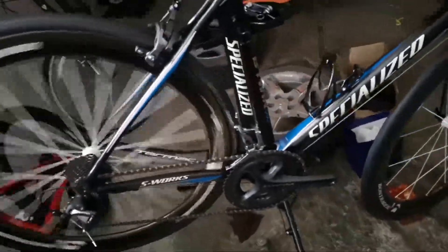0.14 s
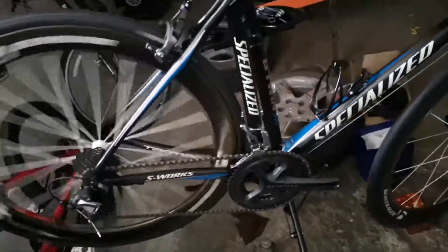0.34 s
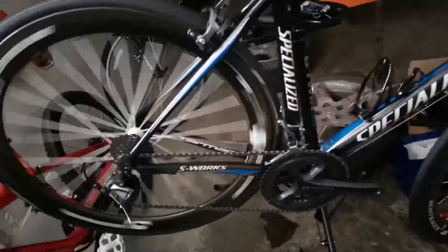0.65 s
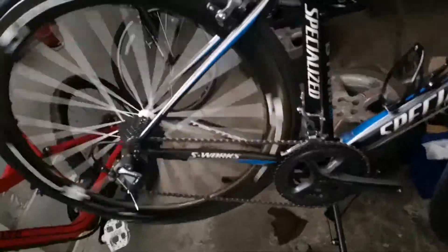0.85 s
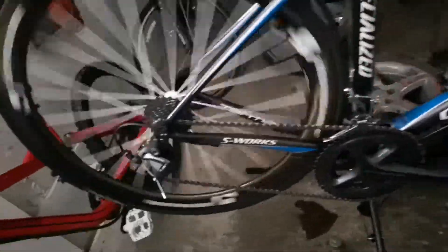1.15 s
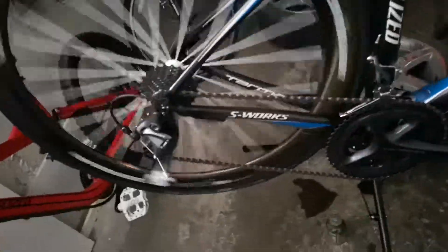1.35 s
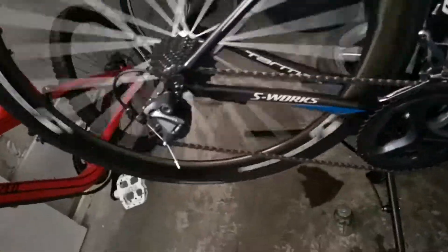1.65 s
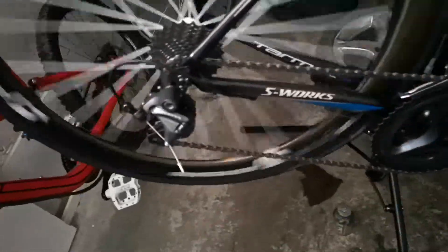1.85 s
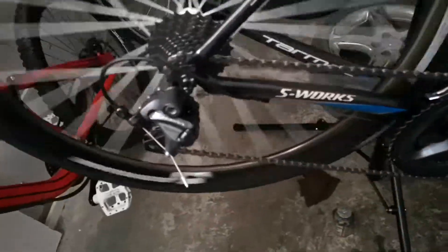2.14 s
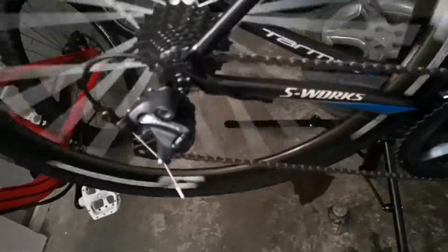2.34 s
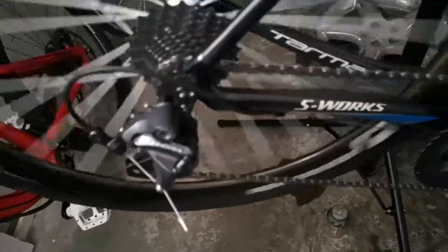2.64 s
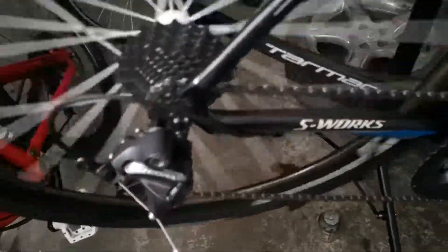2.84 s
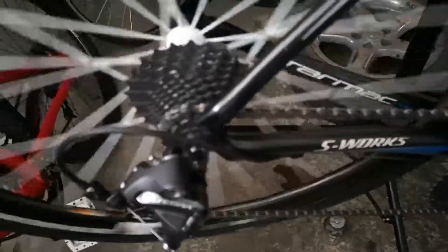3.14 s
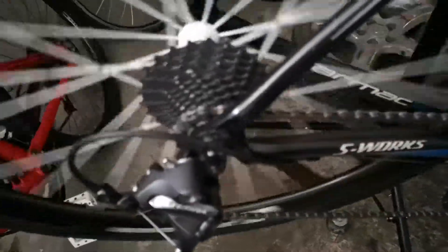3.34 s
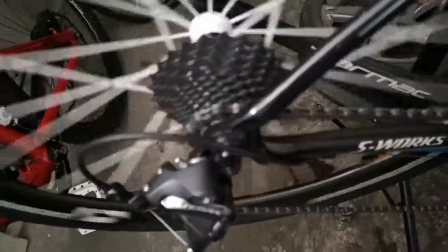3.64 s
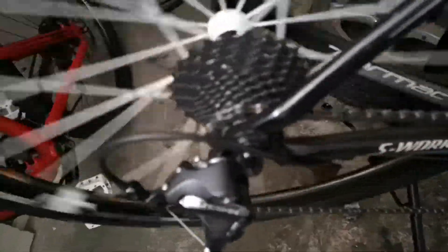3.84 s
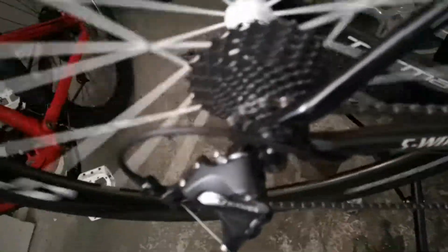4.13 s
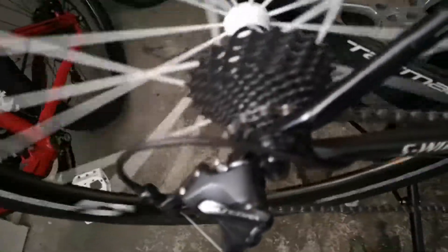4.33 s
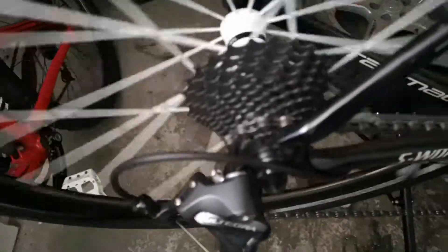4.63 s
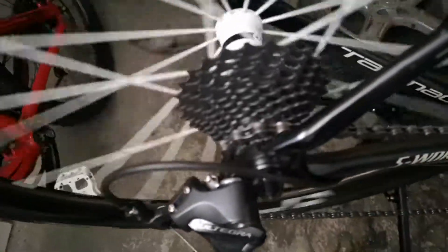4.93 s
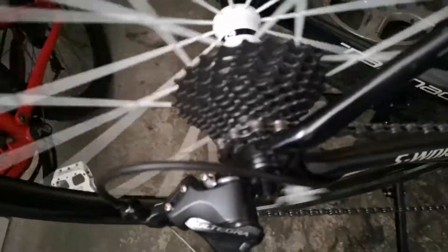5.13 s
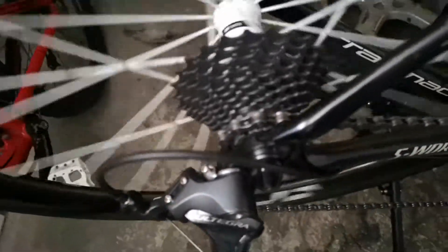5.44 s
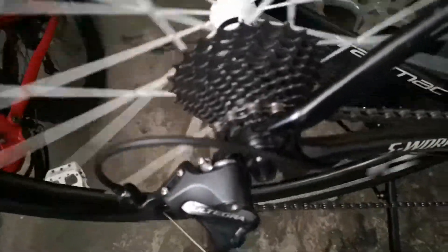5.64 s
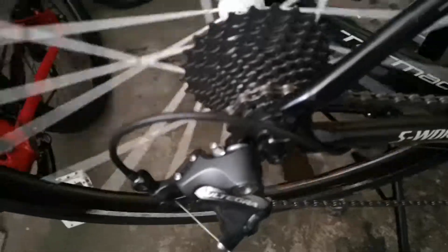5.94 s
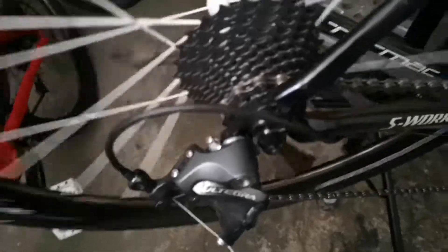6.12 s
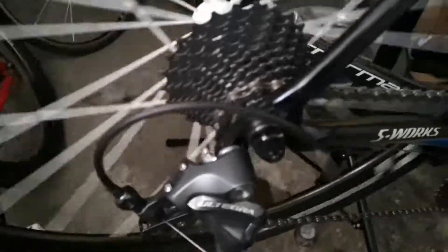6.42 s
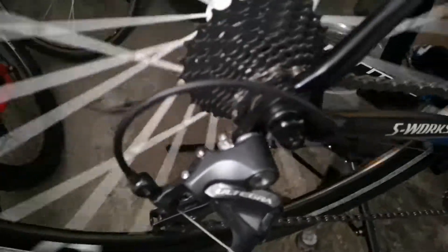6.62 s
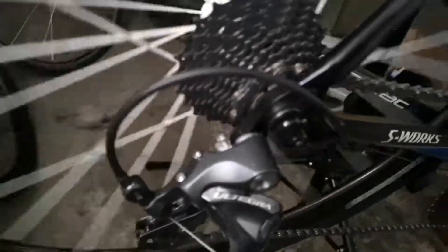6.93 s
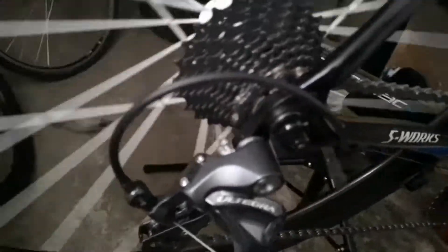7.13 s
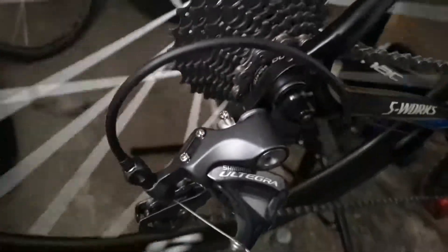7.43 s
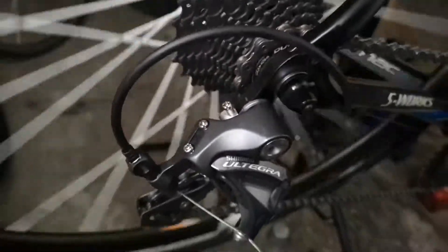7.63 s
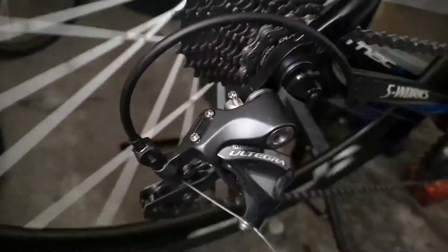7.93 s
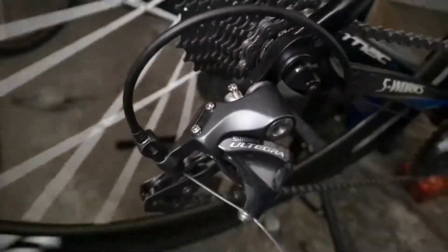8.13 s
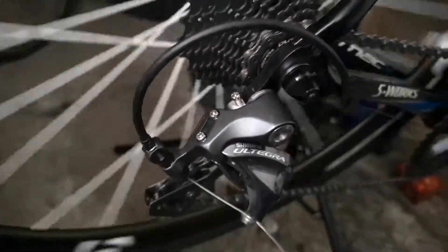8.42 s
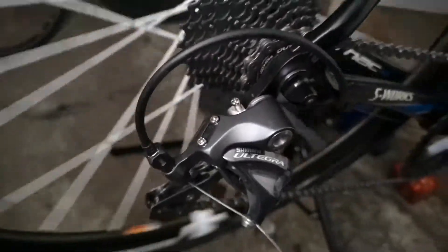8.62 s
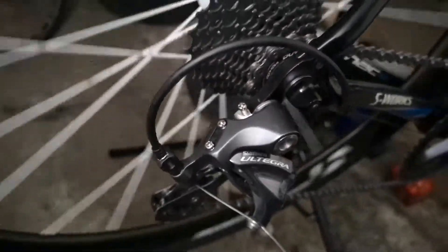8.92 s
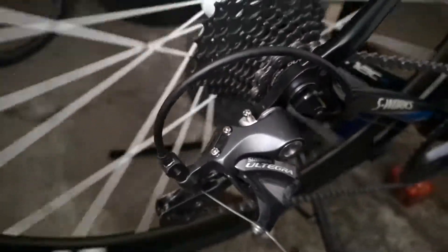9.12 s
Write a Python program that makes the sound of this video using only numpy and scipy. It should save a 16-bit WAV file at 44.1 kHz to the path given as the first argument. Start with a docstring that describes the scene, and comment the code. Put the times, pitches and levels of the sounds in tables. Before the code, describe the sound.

A bicycle's rear wheel is already coasting at the start, its freewheel ratchet making a bright, high-pitched buzz of rapid metallic clicks. The clicking continues for the whole nine seconds or so, slowing gradually from about thirty-five to about twenty clicks a second. It swells with each turn of the wheel, with a light ringing of hub and rim and a faint whirr beneath. From about 2 to 5 seconds the hand-held microphone moves closer, and the clicks grow louder and drier, leaning slightly right. Just before 4 seconds come a few dull handling bumps, the last the strongest. From about 6 to 8.5 seconds the clicks have a harder, grittier snap and a brief steely ring. A softer bump falls at 7 seconds, with faint finger rubs around 8 and 9. Quiet garage air and a faint low hum lie underneath throughout.

```python
"""Bicycle freewheel in a garage

A rear wheel coasts: its pawls drop over 18 ratchet teeth, ever more slowly, and hub, cassette and
rim ring on. The ratchet runs slightly off centre, so the buzz swells once a turn.
A hand-held microphone moves in close, with a few bumps and rubs, over room air and a faint low hum."""
import sys
import numpy as np
from scipy import signal
from scipy.fft import rfft, irfft
from scipy.io import wavfile
from scipy.ndimage import uniform_filter1d

SR = 44100
rng = np.random.default_rng(int(sys.argv[2]) if len(sys.argv) > 2 else 0)


def store_wav(level_fs):
    """Save 16-bit WAV to argv[1]."""
    pcm = np.round(np.clip(np.atleast_2d(level_fs), -1, 1) * 32767)
    wavfile.write(sys.argv[1], SR, pcm.T.astype(np.int16))


N = 408793
TEETH = 18
RIGHT_DELAY_S = .0006  # sound reaches the left channel first


def ratchet(times, teeth, level_db=1.91, hard_db=3.0, clack_db=8, ping_db=-5.5, lead_s=.0041, size=8192):
    """Each pawl drop rings the hub: a clack that swells twice a turn, a cassette ping that swells once."""
    # colour of a pawl strike: f/Hz, level/dB
    strike_colour = [(820, -43.5), (1400, -26.5), (1490, -20), (1760, -24.5), (1930, -2.5), (2090, -10.5),
                     (3500, -10.5), (4070, -3.5), (5180, -2.5), (6080, -13), (6930, -12), (7900, -0.5),
                     (10400, -20.5), (14400, -33), (15500, -21)]
    hz, out = np.fft.rfftfreq(size, 1 / SR), np.zeros((2, N))
    rings = hub_rings(hz)
    wear_db = 1.14 * rng.standard_normal((TEETH, 3))  # each tooth's own strength, clack and ping
    clack, ping, fizz = hump(hz, 2770, 0.29), hump(hz, 9600, 0.26), hump(hz, 19200, 0.78)
    renew_rad = 0.92
    for s, tooth in zip(times, teeth):
        near_db, _, pan_db = mic_position(s)
        vary_db = wear_db[tooth] + 0.55 * rng.standard_normal(3)
        pan_db = pan_db + 2.25 * rng.standard_normal()
        if tooth == 0:  # the hand has moved since the last turn, so the fine peaks shift
            rings = whiten(np.cos(renew_rad) * rings + np.sin(renew_rad) * hub_rings(hz))
        colour_db = curve_at(strike_colour, hz) + near_db + vary_db[0] + hard_db * hardness(s, tooth)
        colour_db += force_db(tooth) * (1 - 0.86 * fizz)  # the top treble follows the force less
        colour_db += clack * (clack_db + 0.5 * lobes(tooth, peak_tooth=6.16, count=2) + vary_db[1])
        colour_db += ping * (ping_db + 2.7 * lobes(tooth, peak_tooth=12.8) + vary_db[2])
        click = irfft(rings[tooth] * pawl_drop(hz) * struck_body(colour_db))
        add(out, s - lead_s, click * gain_of([[pan_db / 2], [-pan_db / 2]]))
    return gain_of(level_db) * out


def pawl_drop(hz, spread_s=.0007, scrape_db=-17, scrape_s=0.00133, lead_s=.004, size=8192, pawls=3):
    """Spectrum of one drop: the pawls scrape off the tooth's edge and land almost together."""
    t = np.arange(size) / SR - lead_s
    landings = lead_s + abs(rng.normal(0, spread_s, (pawls, 1)))
    force = gain_of(rng.normal(0, 4.1, (pawls, 1)))
    blows = (force * np.exp(-2j * np.pi * hz * landings)).sum(0)
    scrape = rfft(rng.standard_normal(size) * np.exp(-abs(t) / scrape_s))
    return whiten(unit_rms(blows) + gain_of(scrape_db) * unit_rms(scrape), bins=301)


def hub_rings(hz, crack_s=0.0062, ring_s=0.012, ring_db=-10, direct_db=-12, damp_db=7, size=8192):
    """Dense metal modes, struck at another spot by each tooth: first arrival, crack, duller ring."""
    t = np.arange(size) / SR
    modes = rng.standard_normal((TEETH, 2, size))
    crack = rfft(modes * np.exp(-t / crack_s))
    ring = rfft(modes * np.exp(-t / ring_s) * (1 - np.exp(-t / crack_s)))
    body = whiten(crack + gain_of(ring_db) * ring * struck_body(-damp_db * hump(hz, 12000, 0.17)))
    direct = np.exp(-2j * np.pi * hz * np.array([[0], [RIGHT_DELAY_S]]))
    return whiten(body + gain_of(direct_db) * direct * np.minimum(hz / 7000, 1))


def turns(s, start_turns=-.06179, turns_per_s=1.96301, drag_per_s=.04, friction_per_s2=.054287):
    """The wheel's angle in turns at time s, as air drag and bearing friction slow it."""
    coast = (1 - np.exp(-drag_per_s * s)) / drag_per_s
    return start_turns + turns_per_s * coast - friction_per_s2 * (s - coast) / drag_per_s


def drop_times(wobble_s=0.00033):
    """Time and tooth of every click; the off-centre ratchet makes them run early and late by turns."""
    clock = np.arange(N) / SR
    passed = TEETH * turns(clock)
    clicks = np.arange(np.ceil(passed[0]), passed[-1]).astype(int)
    times = np.interp(clicks, passed, clock) + wobble_s * lobes(clicks, peak_tooth=16.5)
    return times, clicks % TEETH


def force_db(tooth, off_centre_db=2, oval_db=0.5):
    """How hard the pawls drop from this tooth of the slightly off-centre, slightly oval ratchet."""
    return off_centre_db * lobes(tooth, peak_tooth=7.86) + oval_db * lobes(tooth, 3.66, count=2)


def hardness(s, tooth):
    """How hard the pawls land from this tooth (0-1), heard best from the axle's end."""
    # stretches of hard landings: middle/tooth, half width/teeth, hardness/0-1
    hard_teeth = [(5.6, 1.73, 0.74), (10.3, 0.46, 0.04), (14, 1.06, 0.25)]
    _, axle_view, _ = mic_position(s)
    landing = sum(hard * np.exp(-.5 * ((tooth - mid) / width) ** 2) for mid, width, hard in hard_teeth)
    return axle_view * landing


def pawl_snaps(times, teeth, level_db=-7.5, axle_db=5.0, hard_db=4.0, vary_db=2.5,
               late_s=.0003, rise_s=0.00034, decay_s=0.0025, size=1024):
    """The pawls seat with a dry, gritty snap of steel on steel, which carries only a short way."""
    t, hz, out = np.arange(size) / SR, np.fft.rfftfreq(size, 1 / SR), np.zeros((2, N))
    # colour of the snap: f/Hz, level/dB
    steel = [(1200, -36.5), (2200, -1.0), (5000, -11.5), (6400, -29.0), (8300, -7.0),
             (11000, -22), (15000, -20.5)]
    colour = struck_body(curve_at(steel, hz))
    burst = np.exp(-t / decay_s) * (1 - np.exp(-t / rise_s))
    for s, tooth in zip(times, teeth):
        grit = whiten(rfft(rng.standard_normal((2, size)) * burst), bins=61)
        near_db, axle_view, _ = mic_position(s)
        db = level_db + 1.55 * near_db + axle_db * axle_view
        db += 0.56 * force_db(tooth) + hard_db * hardness(s, tooth) + vary_db * rng.standard_normal()
        add(out, s + late_s, gain_of(db) * irfft(grit * colour))
    return out


def hub_chime(times, teeth, level_db=-1, vary_db=1.0, rise_s=0.00058):
    """Hard landings set the hub chiming briefly, always on the same few tones."""
    # hub modes that only a hard landing wakes: f/Hz, level/dB, t60/s
    chime_modes = [(2262, -4.5, 0.043), (2404, -11.5, .04), (4140, -4, 0.032), (4336, -11.5, .04),
                   (7820, -9, .06)]
    t, out = np.arange(SR // 10) / SR, np.zeros((2, N))
    for s, hard in zip(times, hardness(times, teeth)):
        for hz, db, t60 in chime_modes:
            phase = 2 * np.pi * rng.random((2, 1))
            ring = np.sin(2 * np.pi * hz * t + phase) * ring_envelope(t, t60, rise_s)
            force = hard * gain_of(db + vary_db * rng.standard_normal())
            add(out, s, force * ring / np.linalg.norm(ring))
    return gain_of(level_db) * out


def wheel_ring(times, teeth, level_db=-9.0, vary_db=2.5, beam_hz=900, scatter_s=0.00016):
    """The clicks ring rim, spokes and sprockets; each mode swells as a lobe passes the microphone."""
    # wheel modes with one lobe and with two: f/Hz, level/dB, t60/s, swing/dB, peak/tooth
    one_lobe_modes = [(586.8, -44, .35, 7, 12.5), (7700, -21, .1, 3, 8), (7870, -20, .09, 3, 8),
                      (8010, -22, .09, 3, 8)]
    two_lobe_modes = [(1186, -39, 0.35, 3.5, 3.4), (1519, -28.5, 0.26, 4.9, 4),
                      (1532, -31, 0.78, 8.3, 2.55), (1680, -28, 0.48, 4.1, 4.2),
                      (1894, -17, 0.15, 6.4, 4.63), (1894, -24, 0.061, 4.3, 9.8),
                      (2013, -21.5, 0.16, 5.7, 2.1), (2275, -16.5, 0.015, 3.7, 5.97),
                      (4068, -15.5, 0.026, 4.2, 5.45)]
    t, out = np.arange(SR // 3) / SR, np.zeros((2, N))
    for count, modes in enumerate([one_lobe_modes, two_lobe_modes], 1):
        for hz, db, t60, swing_db, peak_tooth in modes:
            # low modes fill the room, so nearness lifts them less
            near_db = 2.44 * mic_position(times)[0] / (1 + (beam_hz / hz) ** 2)
            swell_db = swing_db * lobes(teeth, peak_tooth, count)
            force = gain_of(db + near_db + swell_db + vary_db * rng.standard_normal(len(times)))
            # the pawls never land quite alike, which scatters the phase of the higher modes
            blows = force[:, None] * np.exp(2j * np.pi * hz * rng.normal(0, scatter_s, (len(times), 2)))
            ring = np.exp(2j * np.pi * hz * t) * ring_envelope(t, t60, rise_s=0.00014)
            ring /= np.linalg.norm(ring.imag)
            for s, blow in zip(times, blows):
                add(out, s, (blow[:, None] * ring).imag)
    return gain_of(level_db) * out


def spoke_swirl(x, path_s=0.00014, smooth_samples=1200):
    """The spinning spokes keep changing the path to each channel, which blurs the ringing tones."""
    at = np.arange(N)
    drift = uniform_filter1d(rng.standard_normal((2, N)), smooth_samples)
    drift = uniform_filter1d(drift, smooth_samples)
    return np.array([np.interp(at + path_s * SR * unit_rms(d), at, side) for d, side in zip(drift, x)])


def hub_whirr(times, swing_db=2.5, oval_db=1):
    """Soft, identical knocks of the hub shell fuse into a whirr that sinks as the wheel slows."""
    # tones of one knock: f/Hz, level/dB, envelope time constant/s
    knock_tones = [(985, 0, .0035), (810, -10, .004)]
    # fader of the whirr: t/s, level/dB
    whirr_fader = [(0.0, -69.5), (1.0, -71.5), (2.1, -67.5), (3.1, -62.5), (5.2, -66), (7.2, -66.5),
                   (9.27, -69.5)]
    t, clock, out = np.arange(SR // 10) / SR, np.arange(N) / SR, np.zeros((2, N))
    stereo_phase = np.array([[0], [np.pi / 2]])
    knock = sum(gain_of(db) * (t / tau * np.exp(-t / tau)) ** 2
                * np.sin(2 * np.pi * hz * t - stereo_phase) for hz, db, tau in knock_tones)
    for s in times:
        add(out, s, knock)
    tooth = TEETH * turns(clock)
    swell_db = swing_db * lobes(tooth, peak_tooth=8) + oval_db * lobes(tooth, peak_tooth=1, count=2)
    return unit_rms(out) * gain_of(np.interp(clock, *np.transpose(whirr_fader)) + swell_db)


def garage(x, wet_db=-4.5, build_s=0.006, paths=6):
    """Reflections off floor and walls: the turning wheel crossfades between their paths."""
    # reverb time of the garage: f/Hz, t60/s
    decay_times = [(500, 1), (2000, 0.4), (4500, 0.2), (8000, 0.18), (15000, 0.23)]
    clock, out = np.arange(N) / SR, np.zeros((2, N))
    send = x * gain_of(wet_db - 0.9 * mic_position(clock)[0])  # the closer, the drier
    angle = turns(clock)
    for path in range(paths):
        taps = rng.standard_normal((2, SR // 2)) * (rng.random((2, SR // 2)) < .12)
        taps *= 1 - np.exp(-(np.arange(SR // 2) / SR / build_s) ** 2)
        hz, t, bands = signal.stft(taps, SR, nperseg=256)
        bands = bands * gain_of(-60 * t / curve_at(decay_times, hz)[:, None])
        tail = signal.istft(bands, SR, nperseg=256)[1]
        away = abs((angle * paths - path + paths / 2) % paths - paths / 2)
        share = np.cos(np.pi / 2 * np.minimum(away, 1))
        out += signal.oaconvolve(send * share, tail / np.linalg.norm(tail[0]), axes=1)[:, :N]
    return out


def mic_position(s):
    """Nearness, view of the axle's end and balance of the hand-held microphone at time s."""
    # the hand's path: t/s, nearness/dB, axle view/0-1, left minus right/dB
    mic_path = [(0.0, -3, 0, -1.5), (1.0, -3.5, 0.14, -0.6), (2.1, -1.35, .1, -1.6), (3.1, 0.7, 0.64, 0.2),
                (4.1, 2.5, 0.28, -4.8), (5.2, 3, 0.66, -3.5), (6.3, 0.7, 1, -2.3), (7.5, 1.2, 1, -1.2),
                (8.4, 0.2, 1, -1), (9.27, 1.2, 0.3, -2)]
    when, *columns = np.transpose(mic_path)
    return [np.interp(s, when, column) for column in columns]


def handling(tap_hz=480, tap_s=0.00064):
    """Dull bumps and soft finger rubs reach both channels through the microphone's housing."""
    # bumps: t/s, level/dB, f/Hz, t60/s, tap over thud/dB
    bumps = [(3.778, -27, 24.7, 0.095, -24), (3.81, -28.5, 50, 0.055, -27),
             (3.9626, -15.5, 106, 0.039, -29), (6.047, -45, 300, 0.056, -15),
             (6.986, -29, 77, 0.027, -12.5)]
    # rubs: t/s, level/dB, length/s, upper edge/Hz
    rubs = [(0.149, -66.5, 0.5, 530), (6.035, -62, 0.14, 380), (7.70, -54, 0.11, 354),
            (7.84, -61.5, 0.096, 348), (8.357, -62, 0.26, 410), (8.96, -60, 0.24, 290)]
    out, t = np.zeros((2, N)), np.arange(SR // 4) / SR
    for s, db, hz, t60, tap_db in bumps:
        thud = -np.sin(2 * np.pi * hz * t) * ring_envelope(t, t60, rise_s=0.0033)
        tap = np.sin(2 * np.pi * tap_hz * t) * t / tap_s * np.exp(1 - t / tap_s)
        add(out, s, gain_of(db) * (thud + gain_of(tap_db) * tap))
    for s, db, length, top_hz in rubs:
        progress = np.arange(SR) / SR / length
        band = signal.butter(4, [70, top_hz], "band", fs=SR, output="sos")
        grit = unit_rms(signal.sosfilt(band, rng.standard_normal(SR)))
        add(out, s, gain_of(db) * grit * 4 * progress * np.exp(1 - 4 * progress))
    return out


def room_tone(air_db=-62, hum_swing_db=2.5):
    """Still air, the rumble of an unsteady hand and a low hum that swells a little with each turn."""
    # colour of the air: f/Hz, level/dB
    air_colour = [(15, -2), (28, 0), (45, -9), (75, -14), (120, -14), (200, -18), (300, -24), (430, -31),
                  (750, -33), (2000, -37), (15000, -45)]
    # likeness of left and right: f/Hz, correlation/0-1
    stereo_likeness = [(30, 1), (90, 1), (180, 0.96), (350, 0.78), (700, 0.76), (2000, 0.13)]
    # resonances of the hum: f/Hz, half width/Hz, level/dB
    hum_peaks = [(157.4, 14.5, 2), (304, 17, -10)]
    # faders of rumble and hum: t/s, level/dB
    rumble_fader = [(0.0, -59), (2.6, -63.5), (3.2, -69.5), (3.8, -54.5), (9.27, -61.5)]
    hum_fader = [(0.0, -75.5), (0.9, -72), (2.3, -65.5), (4.8, -69.5), (5.9, -65), (6.7, -74.5), (7.6, -67),
                 (9.27, -68.5)]
    hz, t = np.fft.rfftfreq(N, 1 / SR), np.arange(N) / SR
    alike = np.clip(curve_at(stereo_likeness, hz), -1, 1)

    def noise(colour):
        left, other = rfft(rng.standard_normal((2, N)))
        right = alike * left + np.sqrt(1 - alike ** 2) * other
        return unit_rms(irfft(np.array([left, right]) * colour, N))
    air = gain_of(air_db) * noise(gain_of(curve_at(air_colour, hz)))
    rumble = noise(hz / (hz + 10) / (1 + (hz / 32) ** 3))
    rumble_db = np.interp(t, *np.transpose(rumble_fader))
    hum = noise(sum(gain_of(db) / (1 + ((hz - f) / width) ** 2) for f, width, db in hum_peaks))
    hum_db = np.interp(t, *np.transpose(hum_fader))
    hum_db += hum_swing_db * lobes(TEETH * turns(t), peak_tooth=6.7)
    return air + rumble * gain_of(rumble_db) + hum * gain_of(hum_db)


def lobes(tooth, peak_tooth, count=1):
    """A swing of +-1 that repeats count times a turn."""
    return np.cos(2 * np.pi * count * (tooth - peak_tooth) / TEETH)


def ring_envelope(t, t60, rise_s):
    """A quick attack, then a fall of 60 dB in t60 seconds."""
    return gain_of(-60 * t / t60) * (1 - np.exp(-t / rise_s))


def struck_body(db):
    """Minimum-phase spectrum with this colour: it rings only after the blow."""
    log_gain = np.log(gain_of(np.r_[db, db[-2:0:-1]]))
    return np.exp(np.conj(signal.hilbert(log_gain)))[:len(db)]


def whiten(spectrum, bins=161):
    """Takes the broad colour out of a spectrum and keeps its fine peaks."""
    return spectrum / np.sqrt(uniform_filter1d(abs(spectrum) ** 2, bins, axis=-1) + 1e-12)


def hump(hz, centre_hz, octaves):
    """A bell on the log-frequency axis."""
    return np.exp(-.5 * (np.log2((hz + 1) / centre_hz) / octaves) ** 2)


def curve_at(points, hz):
    """Reads a table on a log-frequency axis."""
    f, value = np.transpose(points)
    return np.interp(np.log(hz + 1), np.log(f + 1), value)


def gain_of(db):
    """Decibels to amplitude."""
    return 10 ** (np.asarray(db) / 20)


def unit_rms(x):
    """Scales to rms 1."""
    return x / np.sqrt(np.mean(x ** 2) + 1e-20)


def add(mix, s, sound):
    """Lays a sound into the stereo mix at time s."""
    part = mix[:, max(round(s * SR), 0):][:, :sound.shape[-1]]
    part += sound[..., :part.shape[1]]


def scene():
    """Wheel and whirr with their reflections, dry snaps on top, room tone and handling beneath."""
    times, teeth = drop_times()
    wheel = ratchet(times, teeth) + hub_chime(times, teeth) + spoke_swirl(wheel_ring(times, teeth))
    whirr = hub_whirr(times)
    whirr = whirr + garage(whirr, wet_db=-6, paths=1)
    left, right = room_tone() + handling()
    bed = np.array([left, np.roll(right, round(RIGHT_DELAY_S * SR))])
    return wheel + garage(wheel) + pawl_snaps(times, teeth) + whirr + bed


def record(dry, cutoff_hz=15350):
    """Each channel's own colour, then a steep high cut."""
    # colour of the left channel over the right: f/Hz, level/dB
    stereo_tilt = [(600, -0.9), (1400, 0), (2800, 1.8), (5000, 3.5), (7800, 6), (9500, -5.5), (13000, -1)]
    tilt_db = curve_at(stereo_tilt, np.fft.rfftfreq(N, 1 / SR))
    coloured = irfft(rfft(dry) * gain_of([tilt_db / 2, -tilt_db / 2]), N)
    high_cut = signal.firwin(255, cutoff_hz, window=("kaiser", 8), fs=SR)
    return signal.oaconvolve(coloured, high_cut[None], "same")


dry = scene()
out = record(dry)
store_wav(out)
```